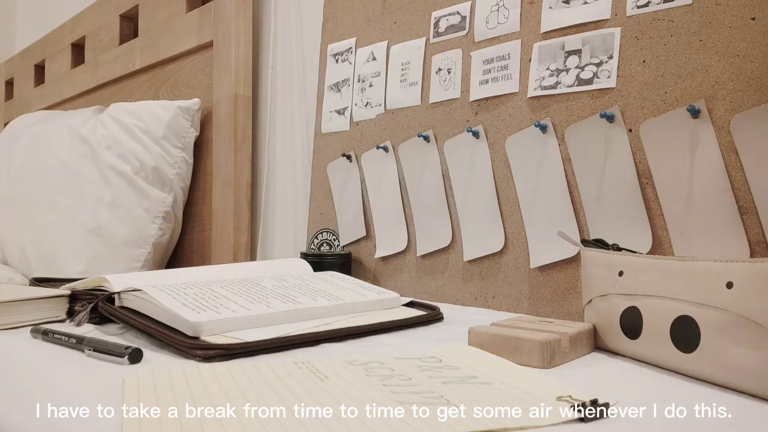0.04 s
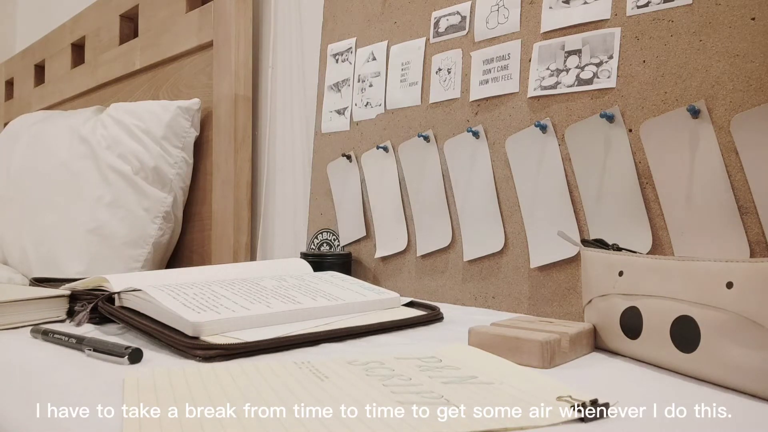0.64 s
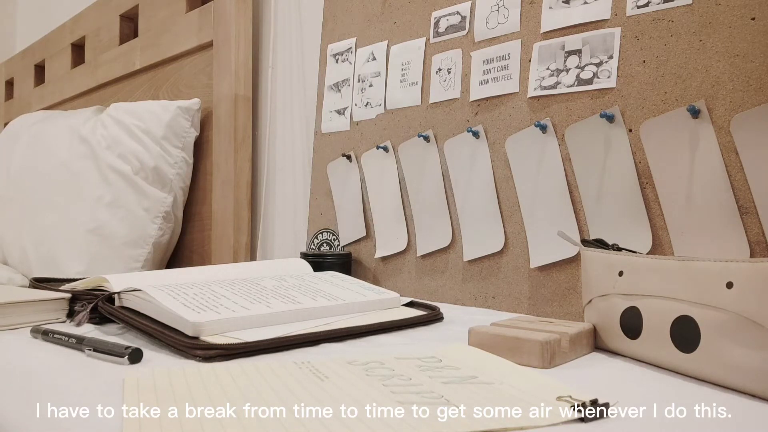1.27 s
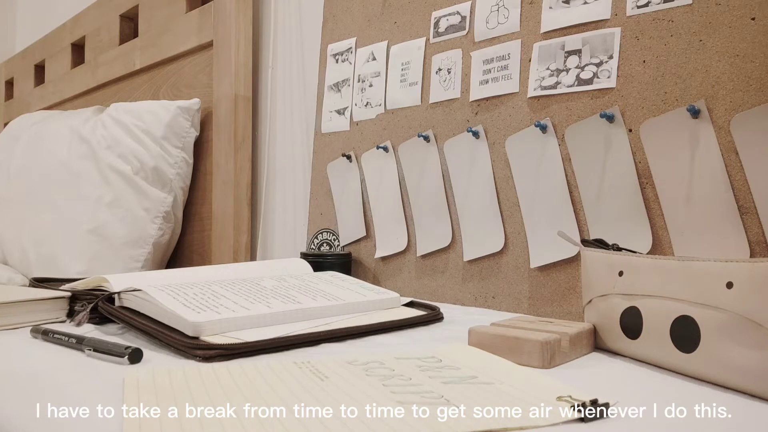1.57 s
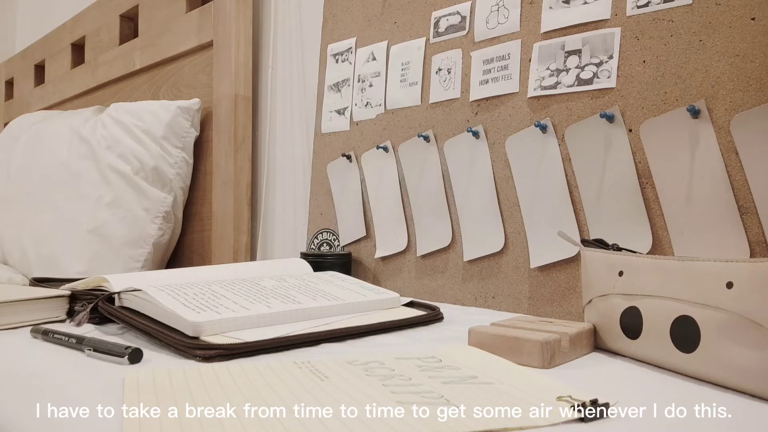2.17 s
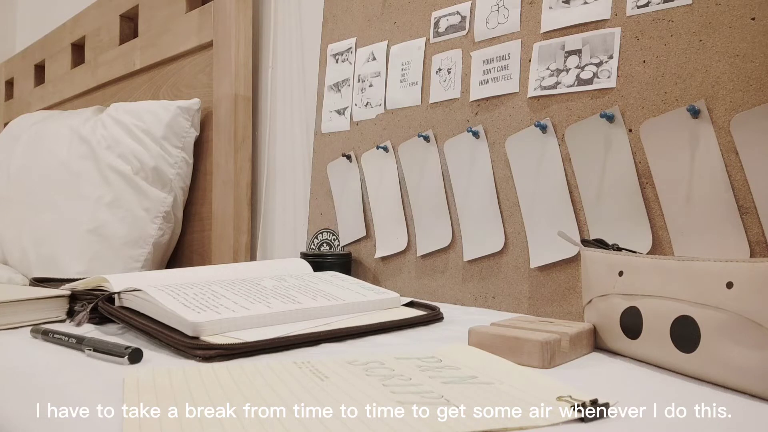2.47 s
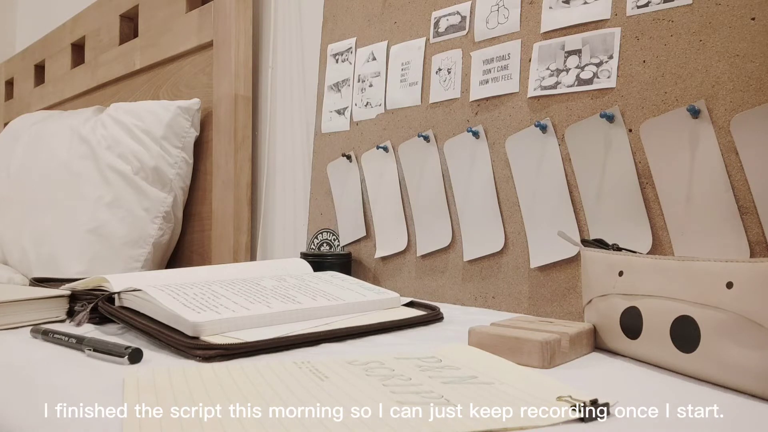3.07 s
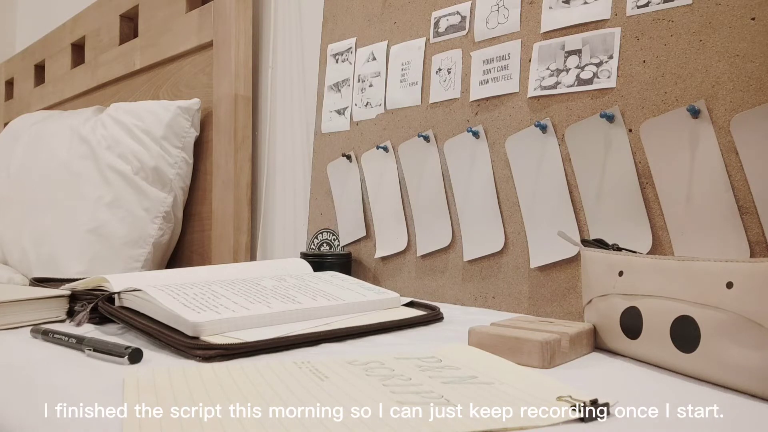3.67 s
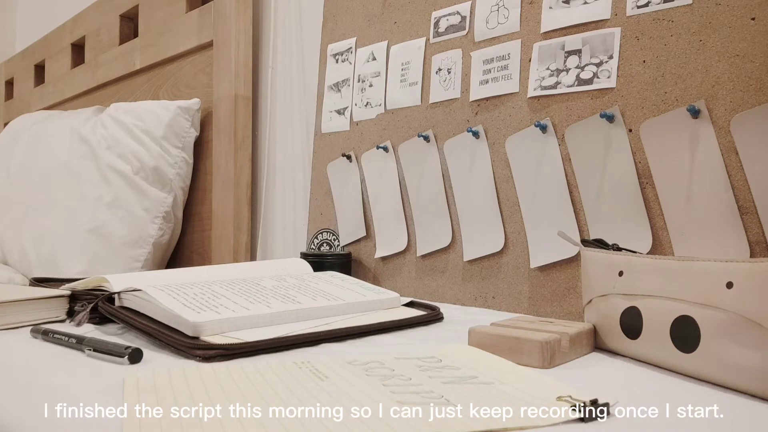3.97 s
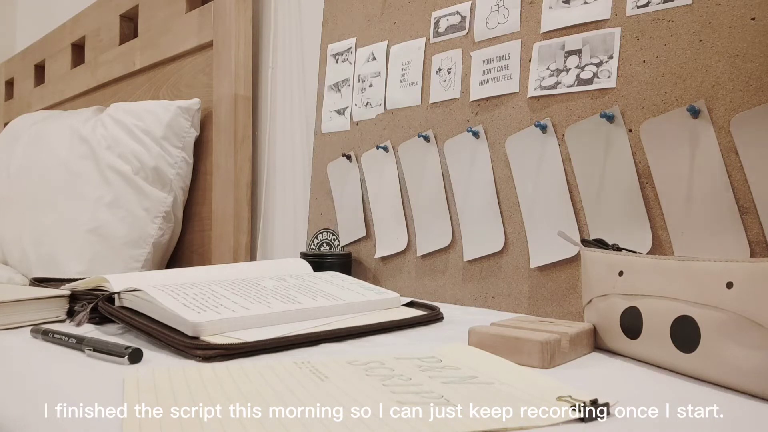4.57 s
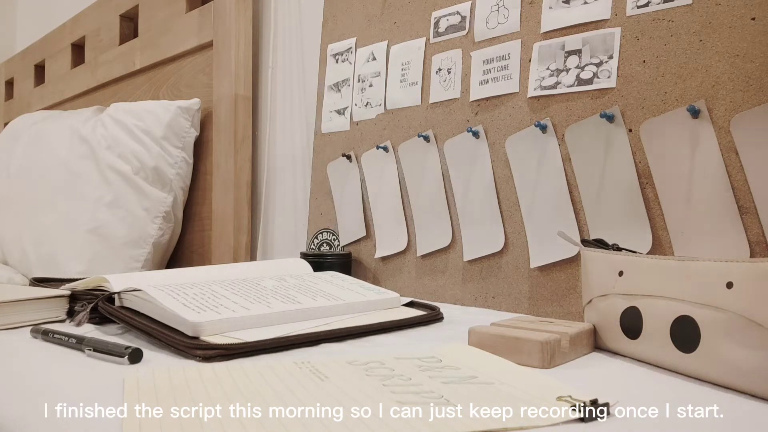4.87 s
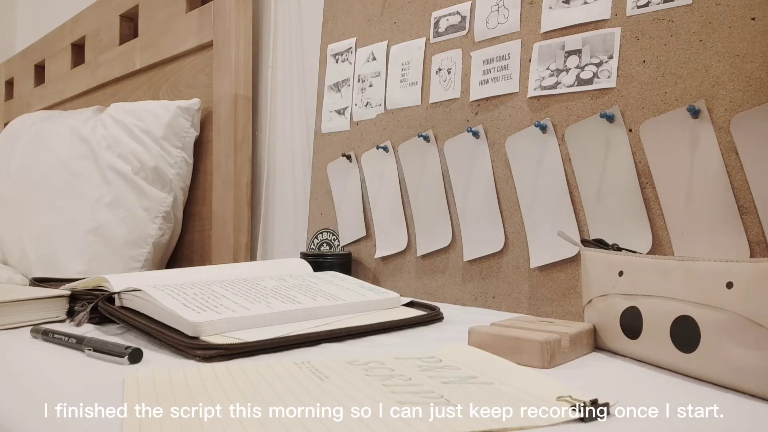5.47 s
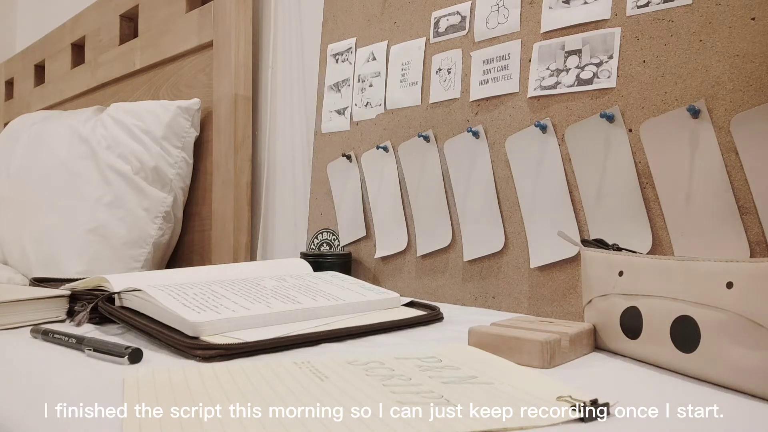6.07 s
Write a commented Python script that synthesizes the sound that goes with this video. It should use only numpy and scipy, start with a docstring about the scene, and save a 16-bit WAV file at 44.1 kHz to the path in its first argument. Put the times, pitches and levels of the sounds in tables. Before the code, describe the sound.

In a quiet bedroom, someone moves about with light taps, soft thuds and rustling clothes. A wooden door is bumped and its hinge gives a short, high squeak. The handle rattles and clacks, the door scuffs through its swing, then shuts with a woody knock and a bright latch snap. Soft steps and more rustling follow, heard in stereo from a desk over a faint low room rumble.

```python
"""A door in a quiet bedroom

Someone moves about, heard from a microphone pair on a desk: small things click, clothes rustle.
A wooden door is bumped and its hinge sticks and slips in a squeak. The handle rattles, the door
scuffs through its swing and shuts on its latch; soft steps follow. Each knock on the door is a
noise burst that rings the modes of wood or metal; cloth and scuffs are swells of grainy noise."""
import sys
import numpy as np
from scipy import signal
from scipy.fft import rfft, irfft, next_fast_len
from scipy.io import wavfile
from scipy.ndimage import uniform_filter1d

SR = 44100
rng = np.random.default_rng(int(sys.argv[2]) if len(sys.argv) > 2 else 0)


def transcribe(u):
    """Save the signal u as a 16-bit wav file named by the first command-line argument.

    u: samples, shape (n,) or (channels, n), limited to [-1, 1]; the rate is SR.
    q: integer samples, one column per channel.
    """
    v = np.clip(np.atleast_2d(u).T, -1, 1)
    q = np.round(v * 32767).astype(np.int16)
    wavfile.write(sys.argv[1], SR, q)


N = 278712
TIME = np.arange(N) / SR
RING = np.arange(SR // 2) / SR  # seconds since a hit
EDGE_HZ = 15600

# The bands of a blow, thump to tick. Each row: low and high edge in Hz, usual contact fade in
# seconds, relative room level in dB, room t60 in seconds.
PARTS = [(64.5, 275, 0.0068, -7.5, 0.42), (283.4, 865, 0.015, 0.5, 0.32), (850, 2370, 0.015, -4.5, 0.38),
         (2240, 3810, 0.0081, -4.5, 0.41), (4070, 7100, 0.0049, -7, 0.38), (8240, 17400, 0.0045, -9, 0.34)]
# Body of a knock on the door panel. Each row: frequency in Hz, relative level in dB.
PANEL_BODY = [(133, 2), (490, -12), (1425, -16.5), (2960, -25), (5500, -29.5), (10850, -27)]
# Airy top of a sliding contact. Each row: frequency in Hz, gain in dB.
SWISH = [(1500, -21), (3000, -3), (5000, -5.5), (7500, -7), (9500, 0.5), (13000, -7.5), (16000, -7.5)]


def door_slam():
    """The leaf hits its frame and rebounds with a woody ring."""
    # Hits, body and modes of the leaf, laid out as struck() describes.
    hits = [(4.2224, -26.5, 0.57, -4.5, -1.5, .4), (4.2901, -31.5, -0.13, 2.5, -3, .35),
            (4.301, -31.5, -1.7, 4, 5.5, 0.56), (4.316, -35.5, -0.89, 1, -7.5, 0.24)]
    body = [(133, 1), (490, 4.5), (1425, 4.5), (2960, -12), (5500, -34.5), (10850, -40.5)]
    modes = [(58, -9, 0.65), (102, -1.5, 0.4), (138, -5, .35), (185, -4, 0.16), (239.6, -9, 0.45),
             (317, -1.5, 0.33), (534, -0.5, 0.3), (676, 0.5, 0.27), (708, -8, 0.3), (972, -4, 0.27),
             (1107, -3.5, 0.22), (1183, -5, 0.25), (1285, -7, .2), (1328, -6.5, .27), (1652, -11, .27),
             (1743, -9.5, 0.3), (2385, -3, 0.048)]
    return struck(hits, body, modes, ring_db=-0.5, swell_s=0.0012, thump_db=-2.5)


def latch():
    """The bolt snaps home with a bright metal ring."""
    # Hits, body and modes of the latch, laid out as struck() describes.
    hits = [(4.2546, -30.5, 0.4, -5.5, -4, 0.51), (4.2570, -31.5, 0.8, 0, -6, 0.57),
            (4.272, -32.5, -0.74, 1, -14.5, 0.26)]
    body = [(133, 1.5), (490, 0.5), (1425, -8), (2960, 0), (5500, -9), (10850, -9)]
    modes = [(374, -4, 0.3), (516, -2, 0.1), (1510, -13, 0.38), (2630, -5.5, 0.2), (2837, -9, 0.2),
             (3020, -10, .2), (3168, -3, 0.16), (3250, -6, 0.14), (3400, -8.5, 0.13), (3654, -2, 0.15),
             (4170, -9, 0.12), (5530, -14, .12), (6150, -16, 0.15), (11780, -13, .12), (12700, -14, .12)]
    return struck(hits, body, modes, ring_db=4, swell_s=0.0005, thump_db=0)


def handle():
    """Pressed down, the handle knocks through its slack, then clacks against its stop."""
    # Hits and modes of the slack, then hits, body and modes of the stop, as struck() describes.
    slack_hits = [(3.671, -39.5, 0.2, -3, 4.3, 0.68), (3.6835, -39.5, 3, 1, 2, 0.5),
                  (3.719, -38, 1.54, 0, 5, 0.69), (3.749, -39, -1.5, -0.5, 10, 0.88)]
    slack_modes = [(58, -11, .35), (109.8, 3, 0.35), (192.7, 3, 0.29), (217, -3, 0.35), (493, -3, 0.33),
                   (540, 1.5, 0.33), (651, -3, 0.25), (963, -7, 0.33), (1137, 1, .3)]
    stop_hits = [(3.8175, -39.5, 0.9, -1.5, -1.5, .8), (3.8605, -36, 0.3, -1, -2.5, 0.38),
                 (3.879, -36.5, -3.5, 6, 7, 1)]
    stop_body = [(133, 3.5), (490, 0), (1425, 1.5), (2960, -4), (5500, -5.5), (10850, -9.5)]
    stop_modes = [(186, -3, 0.19), (368, 0.5, 0.25), (529, -2, 0.27), (1115, -8.5, 0.2), (1578, 2.5, 0.22),
                  (1645, -4.5, .27), (1735, -5, .22), (2400, -11, .2), (2880, -6, .22), (3144, -5.5, 0.25),
                  (3290, -6, 0.2), (3560, -8, .25), (4737, -6, 0.12), (5290, -1, 0.12), (9230, -15, 0.21),
                  (12300, -6, .12)]
    slack = struck(slack_hits, PANEL_BODY, slack_modes, ring_db=2, swell_s=0.00081, thump_db=-0.5)
    return slack + struck(stop_hits, stop_body, stop_modes, ring_db=4, swell_s=0.00059, thump_db=-2.5)


def door_bumps():
    """Hollow bumps on the panel, too light to move the deep bass."""
    # Hits and modes of the panel, laid out as struck() describes.
    hits = [(2.770, -37, -0.46, 3, 0, 0.62), (2.790, -42, -4.5, 11, -10, 0.55),
            (2.8155, -41, -3.5, 3, 2.5, 0.7)]
    modes = [(138, -2.5, 0.5), (179, 1, 0.28), (209.5, 1.5, 0.56), (342, 5.5, 0.22), (378, -4, 0.42),
             (420, 2, .12), (545, 2.5, 0.22)]
    bumps = struck(hits, PANEL_BODY, modes, ring_db=5, swell_s=0.00077, thump_db=-3)
    return band(bumps, 85, EDGE_HZ)


def struck(hits, body, modes, ring_db, swell_s, thump_db):
    """Each blow rings the object's modes, as hard as it hits in their range."""
    # Each hit: start in seconds, level in dB, tilt in dB per octave, hollowness in dB,
    # room send in dB, relative contact length.
    # Each body row: frequency in Hz, relative level in dB.
    # Each mode: frequency in Hz, relative level in dB, t60 in seconds (capped below).
    out, centres = np.zeros((2, N)), part_centres()
    for start, level_db, tilt_db, hollow_db, room_db, length in hits:
        levels_db = level_db + read(body, centres) + tilt_db * np.log2(centres / centres[0])
        levels_db += hollow_db * hump(centres, 490, octaves=0.47)  # a panel hit near its middle
        add(out, start, blow([levels_db[0] + thump_db, *levels_db[1:]], PARTS, room_db, length))
        for hz, db, t60 in modes:
            t60 = min(t60, 0.5 if hz < 1000 else 0.3)
            t = RING[RING < 1.2 * t60]
            drive_db = np.interp(np.log(hz), np.log(centres), levels_db)
            decay = gain_of(drive_db + db + ring_db - 60 * t / t60)
            # Reflections shift the phase between the ports, more for short waves.
            turns = rng.random() + 0.086 * hz / 400 * rng.standard_normal((2, 1))
            rise = 1 - np.exp(-t / (swell_s + 0.71 / hz))  # low modes take longer to build
            add(out, start, decay * rise * np.sin(2 * np.pi * (hz * t + turns)))
    return out


def blow(levels_db, parts, room_db, length):
    """A brief contact and the room's answer; each band fades at its own speed."""
    # Woody colour of a blow. Each row: frequency in Hz, gain in dB.
    wood = [(60, 6), (110, 11.5), (400, 2), (560, 6), (780, -3), (1100, 10), (1700, 9), (2100, -3.5),
            (2800, 0), (3700, -2.5), (4800, -7.5), (6500, -13.5), (9000, -9.5), (15000, -12)]
    size, out = len(RING), 0
    contact = coloured(from_right(rng.standard_normal(size)) + diffuse(size), wood)
    room = coloured(diffuse(size), wood) * (1 - np.exp(-RING / 0.0029))
    for db, (lo_hz, hi_hz, fade, wet_db, t60) in zip(levels_db, parts):
        burst = contact * np.exp(-RING / (fade * length)) / np.sqrt(length)
        tail = room * gain_of(wet_db + room_db - 60 * RING / t60)
        part = band(burst + tail, lo_hz, hi_hz)
        attack_rms = np.sqrt(np.mean(part[:, :SR // 40] ** 2))
        out = out + gain_of(db) * part / attack_rms
    return out


def hinge(room_db=-11, room_t60=0.37, whine_hz=1110):
    """Stick and slip at the pin gives a short squeak that hangs in the room, then a faint whine."""
    # Pitch curve of the squeak. Each row: time in seconds, pitch in Hz.
    glide = [(2.877, 1380), (2.885, 1374), (2.894, 1439), (2.903, 1373), (2.915, 1410), (2.932, 1400),
             (2.948, 1408), (2.963, 1346)]
    # Harmonics that burst out, then hold. Each row: burst level in dB, time to the burst and
    # its width in seconds, held level in dB.
    partials = [(-34, 0.015, 0.008, -41.5), (-42, 0.018, 0.0095, -53), (-46, 0.0105, 0.0075, -69)]
    times, pitch = np.transpose(glide)
    t = np.arange(0, times[-1] - times[0], 1 / SR)
    waver, flutter = wobble((2, len(t)), samples=60)
    hz = np.interp(times[0] + t, times, pitch) * (1 + 0.012 * waver)
    angle = 2 * np.pi * np.cumsum(hz) / SR
    heights = np.array([gain_of(burst_db) * np.exp(-((t - at) / width) ** 2)
                        + gain_of(held_db) * np.minimum(t / at, 1)
                        for burst_db, at, width, held_db in partials])
    chatter = wobble(heights.shape, samples=30)
    heights *= (1 + 0.15 * flutter + 0.13 * chatter) * signal.windows.tukey(len(t), 0.12)
    # Each partial reaches the left port with its own delay, by way of the walls.
    squeak = sum(height * np.sin(k * angle - np.array([[rng.uniform(1.5, 2.2)], [0]]))
                 for k, height in enumerate(heights, 1))
    tail = diffuse(len(RING)) * gain_of(-60 * RING / room_t60) * (1 - np.exp(-RING / 0.0023))
    echo = signal.fftconvolve(squeak, tail / np.linalg.norm(tail[0]), axes=1)
    whine = evened(band(diffuse(N), whine_hz * 0.942, whine_hz * 1.058))
    out = gain_of(-68) * stroke(start=3.2, length=0.3) * whine
    add(out, times[0], squeak)
    add(out, times[0], gain_of(room_db) * echo)
    return out


def door_swing():
    """The door brushes through its swing, sounding the hollow leaf; the bolt hisses on its plate."""
    # Scuffs. Each row: start and length in seconds, level in dB, relative metal hiss in dB.
    scuffs = [(3.866, 0.088, -44.5, 0.5), (3.904, 0.5, -47, -23), (4.107, 0.068, -49.5, -15.5)]
    # Colour of the scrape. Each row: frequency in Hz, gain in dB.
    colour = [(60, -3.5), (110, 0), (240, -7.5), (370, -0.5), (440, -10.5), (540, -4.5), (780, -4.5),
              (1200, -8.5), (1900, -7), (2450, -15.5), (2750, -11), (3150, -13.5), (3800, -5.5),
              (5500, -22.5), (7500, -16.5), (14000, -30.5)]
    # Resonances of the leaf. Each row: centre and width in Hz, relative level in dB.
    modes = [(355, 30, -11), (392, 28, -12), (531, 34, -7), (640, 30, -14), (936, 22, -15), (1005, 26, -11),
             (1332, 40, -12), (1566, 26, -12), (1700, 70, -13), (1840, 70, -11), (2005, 30, -14)]
    scrape = gain_of(-1) * friction(colour, grain_db=1.5)
    ring = sum(gain_of(db) * evened(band(diffuse(N), hz - width / 2, hz + width / 2))
               for hz, width, db in modes)
    hiss = evened(band(friction(SWISH, grain_db=-4), 6000, 14500))
    return sum(gain_of(db) * stroke(start, length) * (scrape + ring + gain_of(hiss_db) * hiss)
               for start, length, db, hiss_db in scuffs)


def clicks(trim_db=-2, tone_db=7.5):
    """Brief, light contacts with no thump: the harder the things that meet, the brighter."""
    # Small things touched around the room, and the sharp contacts of the knocks on the door near 2.8 s. Each
    # row: start in seconds, level in dB before the trim, hardness from 0 to 1, favoured tone in Hz, room send
    # in dB.
    touches = [(0.0577, -46.5, 0.13, 1390, -2.5), (0.114, -57.5, 0, 1180, 8), (0.187, -51.5, 0.07, 805, -2),
               (0.225, -53, 0.09, 890, 3), (0.303, -48, 0.25, 11000, 13), (0.3479, -47, 0.23, 11000, -0.5),
               (0.435, -52.5, 0.54, 1700, 3.5), (0.451, -68, 0.8, 12000, 3), (0.4952, -53, 0.36, 5000, 1),
               (0.5869, -51.5, 0.15, 750, 6), (0.820, -51.5, 0.34, 1250, 9), (1.629, -73.5, 1, 11000, 4),
               (1.6573, -54, 0.91, 12000, 7.5), (2.31, -57.5, 0.4, 1500, 0), (2.438, -60, 0.12, 550, -7),
               (2.773, -62.5, 0.87, 12000, -6), (2.8146, -43.5, 0.25, 2080, -2),
               (3.121, -59.5, 0.63, 2700, 3), (3.242, -65, 0.68, 11730, 0), (3.9821, -39.5, 0.47, 6500, -3),
               (4.4496, -54.5, 0.61, 12000, -2), (5.322, -72, 0.7, 9100, -9)]
    # Two extremes of touch. Each row: frequency in Hz, dull tap in dB, hard click in dB.
    spectra = [(490, -2.5, -26.5), (1366, -9, -10), (2970, -28, 0.5), (5470, -34.5, 2.5),
               (10910, -29.5, 4.5)]
    out, hz = np.zeros((2, N)), part_centres()[1:]
    dull, hard = read(spectra, hz, column=1), read(spectra, hz, column=2)
    for start, db, hardness, tone_hz, room_db in touches:
        levels_db = db + dull + hardness * (hard - dull) + tone_db * hump(hz, tone_hz, octaves=0.74)
        add(out, start, gain_of(trim_db) * blow(levels_db, PARTS[1:], room_db, length=0.55))
    return out


def steps(room_db=-16):
    """A soft push swells and dies in one broad low resonance."""
    # Footfalls and nudges. Each row: start in seconds, level in dB, pitch in Hz,
    # time to the peak in seconds, scuff from 0 to 1.
    footfalls = [(0.009, -53.5, 118.4, 0.013, 0.7), (0.213, -51.5, 142, 0.013, 0.9),
                 (0.296, -43.5, 207, 0.014, 0.7), (0.345, -50, 415, 0.017, 0.2),
                 (1.676, -36, 316, 0.013, 0.24), (2.364, -55.5, 313, 0.016, 0.9),
                 (5.047, -54.5, 273, 0.015, 0.8), (5.243, -50, 283, 0.017, 0.4),
                 (5.3, -54.5, 303, 0.018, .5), (5.591, -51.5, 226, 0.012, 0.74),
                 (5.605, -55.5, 130, 0.028, 0.6)]
    out, bass_t60 = np.zeros((2, N)), PARTS[0][-1]
    for start, db, hz, peak_s, scuff in footfalls:
        u = 2 * RING / peak_s
        push = u ** 2 * np.exp(2 - u) / 4
        thud = push * np.sin(2 * np.pi * hz * RING)
        rumble = evened(band(diffuse(len(RING)), hz * 0.38, hz * 1.53))
        tail = gain_of(room_db - 60 * RING / bass_t60) * (1 - np.exp(-u))
        add(out, start, gain_of(db) * (thud + rumble * (scuff * push + tail)))
    return out


def clothes():
    """Each stroke of cloth blends low rubbing with high swishing."""
    # Moves of clothes and hands. Each row: start and length in seconds, level in dB,
    # swish against rub in dB.
    moves = [(-0.01, 0.36, -58, -7.5), (0.332, 0.11, -63, 6), (0.43, 0.18, -63, -7),
             (0.832, 0.085, -59.5, -5.5), (0.869, 0.1, -61.5, -9), (0.934, 0.32, -69, 10),
             (1.304, 0.21, -71, 14), (1.693, 0.19, -63, -14), (2.291, 0.14, -57, -23),
             (2.633, 0.23, -59, -29), (2.82, 0.44, -64, -21), (3.13, 0.34, -69, 1),
             (5.242, 0.28, -64.5, 0.5), (5.519, 0.33, -70, 9), (5.782, 0.36, -63, 8),
             (6.077, 0.41, -62.5, 1)]
    # Colour of the rub. Each row: frequency in Hz, gain in dB.
    rub_colour = [(150, -32), (420, 8.5), (600, 6), (800, -3.5), (1100, 0), (1350, -1.5), (1700, -2.5),
                  (2400, -18.5), (5000, -17), (9000, -48)]
    rub, swish = friction(rub_colour, grain_db=2.4), friction(SWISH, grain_db=2.6)
    out = np.zeros((2, N))
    for start, length, db, swish_db in moves:
        cloth = (rub + gain_of(swish_db) * swish) / np.hypot(1, gain_of(swish_db))
        out += gain_of(db) * stroke(start, length) * cloth
    return out


def room_tone(rumble_db=-59.5, hiss_db=-74.5):
    """The still air of the room rumbles under a thin microphone hiss."""
    # Colours of the air and the hiss. Each row: frequency in Hz, gain in dB.
    air_colour = [(15, -59), (25, -37.5), (49, -14.5), (75, -4), (119, 3), (153, -4), (237, -1), (319, -4),
                  (383, -3), (450, -8.5), (711, -12), (1000, -16), (6000, -31.5), (7800, -54),
                  (13200, -120)]
    hiss_colour = [(3500, -35.5), (6200, -1.5), (7600, -6.5), (9400, 0),
                   (10800, -6), (12000, 3.5), (13500, -1), (15500, -1.5)]
    # Stereo image of the air. Each row: frequency in Hz, left-right correlation.
    air_likeness = [(40, 1), (130, 0.6), (300, 0.41), (640, 0.19), (1400, -0.037), (3000, 0.0096)]
    rumble = evened(coloured(diffuse(N, air_likeness), air_colour))
    hiss = evened(coloured(rng.standard_normal((2, N)), hiss_colour))
    return gain_of(rumble_db) * rumble + gain_of(hiss_db) * hiss


def friction(colour, grain_db):
    """Rubbing: noise that catches and lets go in tiny grains."""
    grains = gain_of(grain_db * wobble(N, samples=120))
    return evened(coloured(diffuse(N) * grains, colour))


def stroke(start, length, skew=0.51, fullness=0.85):
    """Speed of one movement: it swells quickly from rest and eases off more slowly."""
    progress = np.clip((TIME - start) / length, 0, 1)
    return abs(np.sin(np.pi * progress ** skew)) ** fullness


def diffuse(size, likeness=None):
    """Noise from all sides: the two microphone ports hear the same bass but different treble."""
    # Stereo image of the room's echoes. Each row: frequency in Hz, left-right correlation.
    room_likeness = [(80, 1), (130, 0.88), (220, 0.64), (360, 0.55), (600, 0.4), (1100, -0.12),
                     (2000, -0.00029)]
    padded = next_fast_len(size)
    same = np.clip(read(likeness or room_likeness, np.fft.rfftfreq(padded, 1 / SR)), -1, 1)
    left, other = rfft(rng.standard_normal((2, padded)))
    right = same * left + np.sqrt(1 - same ** 2) * other
    return irfft(np.array([left, right]), padded)[:, :size]


def from_right(x, lag_samples=16):
    """Sound from the right reaches the left port later."""
    return np.array([np.r_[np.zeros(lag_samples), x[:-lag_samples]], x])


def coloured(x, curve, column=1, size=4096):
    """Minimum-phase EQ that follows a curve in dB."""
    hz = abs(np.fft.fftfreq(size, 1 / SR))
    log_gain = np.log(gain_of(read(curve, hz, column)))
    taps = np.fft.ifft(np.exp(np.conj(signal.hilbert(log_gain)))).real[:size // 2]
    return signal.oaconvolve(np.atleast_2d(x), taps[None], axes=1)[:, :x.shape[-1]]


def band(x, lo_hz, hi_hz):
    """Causal band-pass."""
    return signal.sosfilt(signal.butter(4, [lo_hz, hi_hz], "band", fs=SR, output="sos"), x)


def wobble(shape, samples):
    """Smoothed random motion at rms 1."""
    return evened(uniform_filter1d(rng.standard_normal(shape), size=samples))


def part_centres():
    """Middle frequency of each band of a blow."""
    return np.array([np.sqrt(lo_hz * hi_hz) for lo_hz, hi_hz, *_ in PARTS])


def hump(hz, centre_hz, octaves):
    """A broad bell on a log-frequency axis, 1 at its centre."""
    return np.exp(-(np.log2(hz / centre_hz) / octaves) ** 2)


def read(curve, hz, column=1):
    """One column of a spectrum table on a log-frequency axis."""
    columns = np.transpose(curve)
    return np.interp(np.log(hz + 1), np.log(columns[0]), columns[column])


def add(mix, start, sound):
    """Mixes a stereo sound in at a time in seconds."""
    part = mix[:, max(round(start * SR), 0):][:, :sound.shape[1]]
    part += sound[:, :part.shape[1]]


def gain_of(db):
    """Decibels to amplitude."""
    return 10 ** (np.asarray(db) / 20)


def evened(x):
    """Scales to rms 1."""
    return x / np.sqrt(np.mean(x ** 2) + 1e-20)


def scene():
    """Door and movement enter the two ports, each with its own treble, over the room tone."""
    # Treble of the microphone ports. Each row: frequency in Hz, left and right gain in dB.
    ports = [(5010, -2, -2), (7040, -3, -4), (8210, -6, -10.5), (9090, 0, -8), (10670, -7.5, -11),
             (11900, -5.5, 6.5), (15400, -13, -10.5), (15970, -38, -6.5)]
    door = door_bumps() + handle() + latch() + door_slam()
    left, right = door + clicks() + steps() + hinge() + door_swing() + clothes()
    return np.vstack([coloured(left, ports, column=1), coloured(right, ports, column=2)]) + room_tone()


def record(dry):
    """A steep low-pass takes off the very top."""
    lowpass = signal.firwin(255, EDGE_HZ, window=("kaiser", 8), fs=SR)
    return signal.oaconvolve(dry, lowpass[None], "same")


dry = scene()
out = record(dry)
transcribe(out)
```